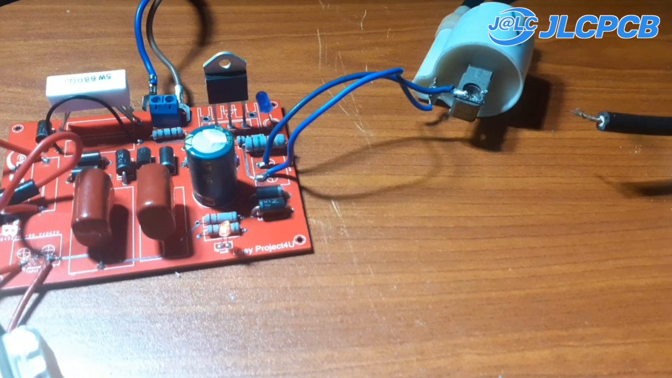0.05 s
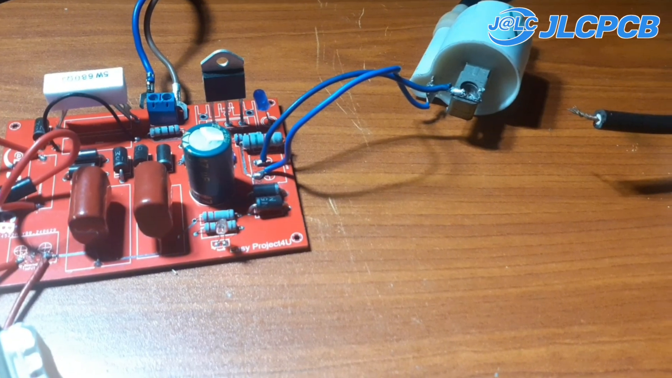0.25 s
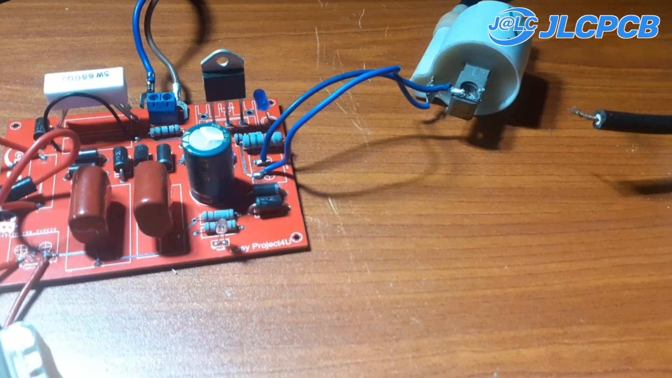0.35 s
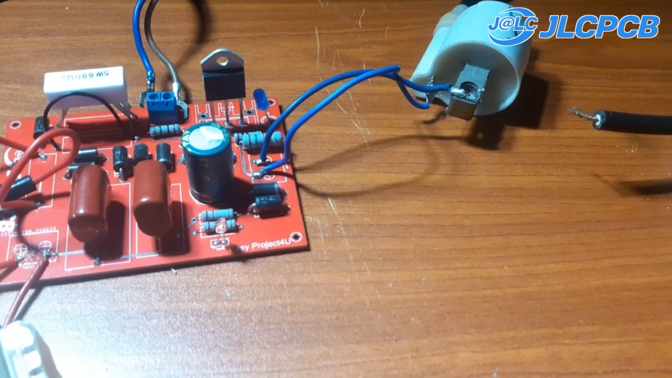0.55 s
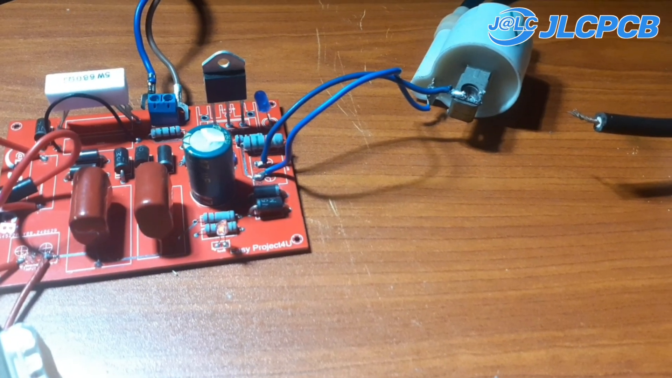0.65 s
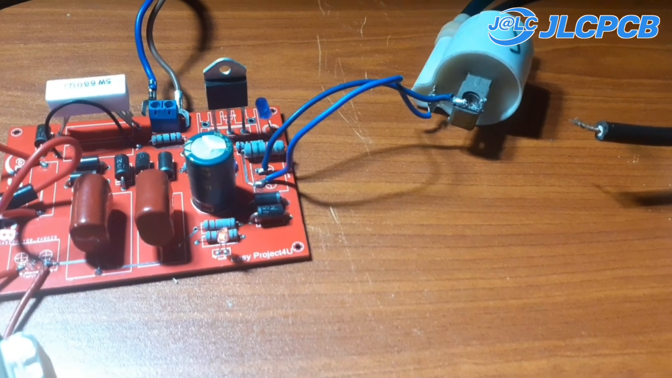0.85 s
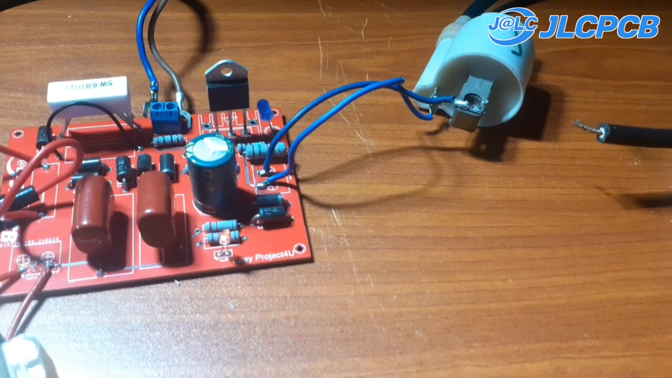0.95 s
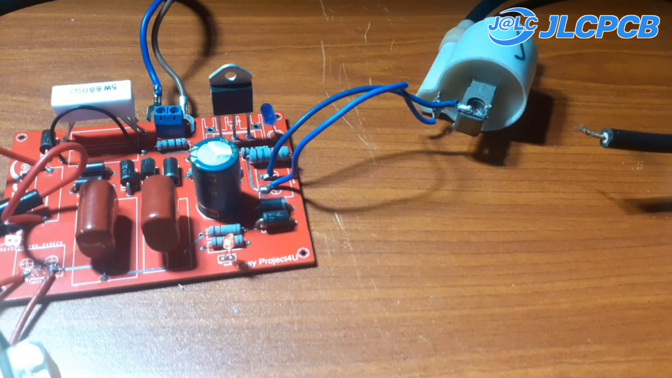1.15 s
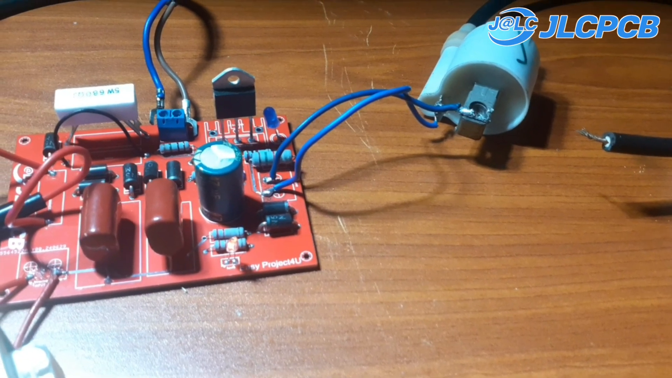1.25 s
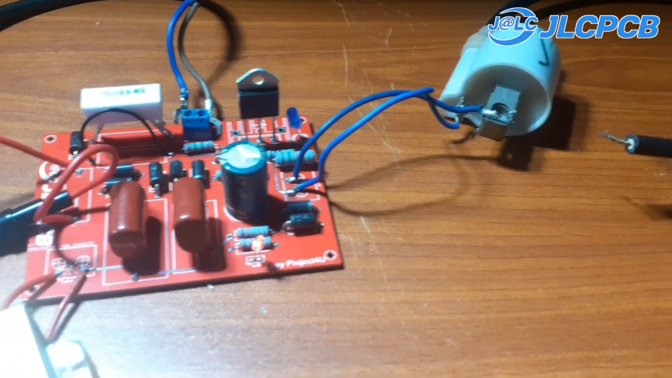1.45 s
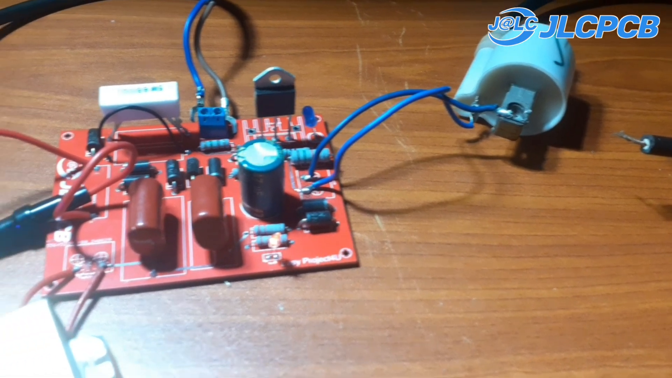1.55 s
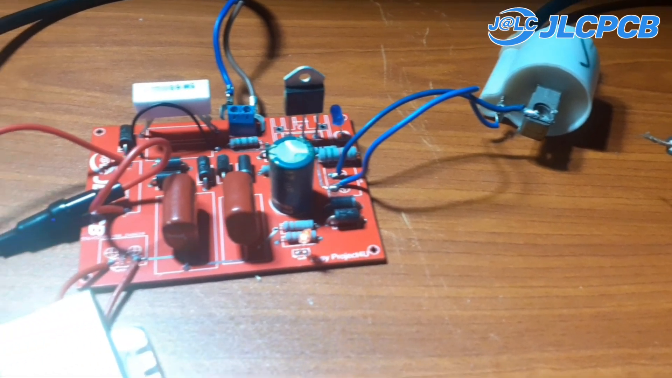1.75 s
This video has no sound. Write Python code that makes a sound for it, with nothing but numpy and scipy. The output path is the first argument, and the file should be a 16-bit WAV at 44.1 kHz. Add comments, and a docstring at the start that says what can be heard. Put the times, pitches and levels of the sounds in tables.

```python
"""In a small room, a high-voltage coil on a wooden desk snaps one spark across its gap.
The shock wave reflects off the desk and reverberates in the room, and the discharge kicks the
microphone's circuit into a short low thump. Throughout, drive pulses make the coil tick about
160 times a second, sagging after the spark and recovering, over a slowly beating hum."""
import sys
import numpy as np
from scipy import signal
from scipy.fft import rfft, irfft, next_fast_len
from scipy.io import wavfile

SR = 44100
rng = np.random.default_rng(int(sys.argv[2]) if len(sys.argv) > 2 else 0)


def generate_wav(signal):
    """Clip the signal to [-1, 1] and save it as 16-bit WAV at the path in sys.argv[1]."""
    frames = np.transpose(np.atleast_2d(signal))
    scaled = np.clip(frames, -1, 1) * 32767
    pcm = np.round(scaled).astype(np.int16)
    wavfile.write(sys.argv[1], SR, pcm)


N = 79380

# The discharge across the gap. Each row: start in seconds, strength in dB.
DISCHARGES = [(0.2407, 4.0)]


def amp(db):
    """Amplitude ratio of a level in decibels."""
    return 10 ** (np.asarray(db) / 20)


def unit(x):
    """Normalisation to an rms of 1."""
    return x / np.sqrt(np.mean(x ** 2) + 1e-20)


def along(points, hz):
    """Interpolation of (Hz, value) points on a logarithmic frequency axis."""
    f, v = np.transpose(points)
    return np.interp(np.log(hz + 1), np.log(f + 1), v)


def filtered(x, response):
    """Linear filtering: the spectrum of x times a complex frequency response."""
    size = 2 * next_fast_len(N)
    return irfft(rfft(x, size) * response(np.fft.rfftfreq(size, 1 / SR)), size)[..., :N]


def coloured(x, spectrum, pan=((1, 0), (2, 0))):
    """Minimum-phase stereo filtering at unit mean power gain; pan is left minus right in dB."""
    def response(hz):
        gain = unit(amp(along(spectrum, hz) + np.outer([.5, -.5], along(pan, hz))))
        cepstrum = irfft(np.log(gain + 1e-9))
        half = len(hz) - 1
        cepstrum[:, 1:half] *= 2  # folding makes the response causal
        cepstrum[:, half + 1:] = 0
        return np.exp(rfft(cepstrum))
    return filtered(x, response)


def delay(seconds, hz):
    """A pure delay: phase lag proportional to frequency."""
    return np.exp(-2j * np.pi * np.outer(seconds, hz))


def reverberate(x, t60s, build_s):
    """Diffuse field: convolution with unit-energy noise that decays exponentially in each band."""
    hz, t, bands = signal.stft(rng.standard_normal((2, SR)), SR, nperseg=256)
    decay = amp(-60 * t / along(t60s, hz)[:, None])
    tail = signal.istft(bands * decay, SR, nperseg=256)[1]
    tail *= 1 - np.exp(-np.arange(tail.shape[1]) / SR / build_s)
    tail /= np.linalg.norm(tail, axis=1, keepdims=True)
    return signal.fftconvolve(x, tail, axes=1)[:, :N]


def pulses(times, gains):
    """Band-limited impulses: windowed sincs centred between samples."""
    centres = np.asarray(times)[:, None] * SR
    taps = np.floor(centres).astype(int) + np.arange(-7, 9)
    kernel = np.sinc(taps - centres) * np.cos(np.pi * (taps - centres) / 16) ** 2
    return np.bincount(np.clip(taps, 0, N).ravel(), (kernel * gains[:, None]).ravel(), N + 1)[:N]


def background():
    """Beating: close hum tones interfere, and a rumble swells in step with them under faint hiss."""
    # Hum tones. Each row: frequency in Hz, rms level in dB.
    tones = [(49.0, -67), (50.85, -69.5), (100.1, -78), (101.9, -76), (203.7, -83)]
    # Noise spectra. Each row: frequency in Hz, relative level in dB.
    rumble_spectrum = [(25, -9), (40, -4), (70, 1.5), (130, -1), (220, 1), (400, -10.5), (490, -5.5),
                       (620, -21.5), (800, -25.5), (2000, -20.5)]
    hiss_spectrum = [(25, -13), (300, -7.5), (600, -10), (1000, -19), (1900, 2), (3300, -2.5), (5000, -27),
                     (6600, -3.5), (9000, -17), (12000, -17.5), (15500, -10), (16000, -17)]
    t = np.arange(N) / SR - 0.53  # seconds from a crest of the beat
    hum = sum(amp(db) * np.sqrt(2) * np.cos(2 * np.pi * hz * t) for hz, db in tones)
    beat = np.cos(2 * np.pi * (tones[1][0] - tones[0][0]) * t)
    mid, side = coloured(rng.standard_normal((2, N)), rumble_spectrum)
    rumble = unit(mid + 0.52 * np.outer([1, -1], side)) * amp(-71.5 + 3.2 * beat)
    hiss = unit(coloured(rng.standard_normal((2, N)), hiss_spectrum))
    return hum + rumble + amp(-72.5) * hiss


def coil_ticks():
    """Impulse excitation: each drive pulse sounds the core, a 3 kHz ring, a rattle and a thin whine."""
    # Drive rate. Each row: time in seconds, ticks per second.
    rate = [(0, 161.5), (0.238, 161.5), (0.25, 159.3), (0.55, 159.55), (0.95, 159.95), (1.5, 161.0),
            (1.8, 161.25)]
    # The coil's resonances. Each row: frequency in Hz, relative level in dB.
    core_spectrum = [(100, -30), (200, -9), (320, -7), (490, -9.5), (640, -27.5), (1100, -30), (1450, -8),
                     (1900, 1), (2200, -7.5), (2450, 0.5), (2800, -10), (3200, 7.5), (3600, 1.5),
                     (4300, -30), (5100, -14), (6500, -4.5), (7900, -17), (9000, -16.5), (16000, -28)]
    whine_spectrum = [(100, -70), (14000, -40), (15000, -13), (15400, 0), (15650, -5), (15900, -35)]
    ring_spectrum = [(100, -24.5), (1800, -34.5), (2600, -11), (3050, -12), (3400, 5.5), (3900, -0.5),
                     (4400, -8), (4800, -23), (5400, -16), (16000, -79.5)]
    rattle_spectrum = [(100, -103), (7000, -40), (9200, -31), (9950, -5), (10800, -4.5), (11500, -18),
                       (11950, 3), (12600, -27.5), (13200, -0.5), (13700, -8.5), (14100, -5),
                       (14700, -27.5), (16000, -27)]
    # The whine rises near the end. Each row: time in seconds, level in dB.
    whine_levels = [(0, -80), (1.3, -87), (1.6, -73), (1.8, -72)]
    # Sag and recovery. Each row: time in seconds, ring level in dB, rattle level in dB.
    brightness = [(0, -60.5, -71.5), (0.22, -60.5, -72.5), (0.259, -61.5, -78), (0.7, -68.5, -74.5),
                  (1.0, -65.5, -72.5), (1.245, -64.5, -72.5), (1.27, -60.5, -71.5), (1.55, -59.5, -70),
                  (1.8, -59.5, -70.5)]
    # The ticks' reverberation. Each row: frequency in Hz, 60 dB decay time in seconds.
    room_t60 = [(100, 0.063), (16000, 0.042)]
    first_tick_s, right_lag_s, spread_db = 0.0025, 0.0003892, 0.33
    t = np.arange(N) / SR
    cycles = np.cumsum(np.interp(t, *np.transpose(rate))) / SR
    cycles -= np.interp(first_tick_s, t, cycles)
    times = np.interp(np.arange(int(cycles[-1]) + 1), cycles, t)
    train = unit(pulses(times, amp(-spread_db * rng.standard_normal(len(times)))))

    def resonance(spectrum, db, left_db):
        return coloured(train * amp(db), spectrum, pan=[(1, left_db)])

    knots_s, ring_db, rattle_db = np.transpose(brightness)
    core = resonance(core_spectrum, db=-66, left_db=-0.5)
    whine = resonance(whine_spectrum, np.interp(t, *np.transpose(whine_levels)), left_db=-0.5)
    ring = resonance(ring_spectrum, np.interp(t, knots_s, ring_db), left_db=13)
    rattle = resonance(rattle_spectrum, np.interp(t, knots_s, rattle_db), left_db=14)
    direct = filtered(core + whine + ring + rattle, lambda hz: delay([0, right_lag_s], hz))
    room = reverberate(core + whine + 0.5 * (ring + rattle), room_t60, build_s=0.0016)
    return direct + amp(-10) * room


def discharge():
    """Impulsive source: the spark lasts only an instant."""
    starts, db = np.transpose(DISCHARGES)
    return pulses(starts, amp(db))


def circuit_thump():
    """Electrical pickup: the discharge kicks the microphone's circuit, which rings with falling pitch."""
    # Pickup gain in dB, left then right.
    pickup_db = [-17, -20.5]
    kick_s, ring_s = 0.0011, 0.021
    final_hz, drop_hz, drop_s = 52, 113, 0.0038
    t = np.arange(N) / SR
    kick = -amp(1) * np.sin(np.pi * np.minimum(t / kick_s, 1))
    after = np.maximum(t - kick_s, 0)
    cycles = final_hz * after + drop_hz * drop_s * (1 - np.exp(-after / drop_s))
    ring = np.sin(2 * np.pi * cycles) * np.exp(-(after / ring_s) ** 2)
    thump = signal.fftconvolve(discharge(), kick + ring)[:N]
    return np.outer(amp(pickup_db) * [1, -1], thump)  # opposite polarity on the two channels


def spark():
    """Multipath propagation: a shock wave arrives directly, by reflection and as reverberation."""
    # Spectra of the shock wave and the room's answer. Each row: frequency in Hz, relative level in dB.
    crack_spectrum = [(120, -18.5), (400, -16), (900, -15), (1680, -7), (2300, -4.5), (3100, -5),
                      (4350, -7), (5730, -8.5), (7010, -11), (8270, -11), (9400, -17), (10900, -7),
                      (12200, -14), (14900, -9), (16000, -11.5)]
    room_spectrum = [(88, -63), (150, -17), (368, -15.5), (484, -14.5), (716, -13), (1040, -11.5),
                     (1120, -9.5), (1560, -11), (1720, -8), (2550, -6), (4950, -8.5), (8070, -7),
                     (9820, -14), (15100, -9), (16000, -26.5)]
    # Their stereo balance. Each row: frequency in Hz, left minus right in dB.
    crack_pan = [(300, 2), (700, 22.5), (1290, 1), (2380, -5.5), (4400, 5.5), (8120, -6), (15000, -3.5)]
    room_pan = [(500, -1.5), (2400, 0), (4400, -0.5), (8100, -3.5), (15000, 1.5)]
    # Reflections off the desk and coil. Each row: left and right delays in seconds, gain.
    bounces = [(0.00009, 0.00012, 0.7), (0.00035, 0.00035, 0.71), (0.00047, 0.000534, -0.4)]
    # Reflections off nearby surfaces. Each row: delay in seconds, gain in dB.
    echoes = [(0.0056, -16.5), (0.0162, -28.5), (0.0255, -27.5)]
    # The room's main and lingering decays. Each row: frequency in Hz, 60 dB decay time in seconds.
    room_t60 = [(200, 0.31), (1000, 0.34), (3000, 0.37), (8000, 0.31), (15000, 0.24)]
    linger_t60 = [(200, 0.39), (1000, 0.87), (3000, 1), (7000, 0.81), (11000, 0.84), (15000, 0.26)]
    shock = discharge()
    crack = coloured(shock, crack_spectrum, crack_pan)
    bounced = filtered(crack, lambda hz: sum(gain * delay(lags, hz) for *lags, gain in bounces))
    scatter = amp(-2) * reverberate(crack, t60s=[(1, 0.03)], build_s=0.0006)
    wash = coloured(shock, room_spectrum, room_pan)
    echoed = filtered(wash, lambda hz: sum(amp(db) * delay(lag, hz) for lag, db in echoes))
    early = reverberate(echoed, t60s=[(1, 0.0073)], build_s=0.0001)
    room = amp(3) * reverberate(wash, room_t60, build_s=0.006)
    linger = amp(-21.5) * reverberate(wash, linger_t60, build_s=0.006)
    return scatter + early + room + linger - amp(2.5) * (crack + bounced)


def scene():
    """Superposition of all sources at the microphone."""
    return spark() + circuit_thump() + coil_ticks() + background()


def record(dry):
    """Saturation and band limiting: clipping at full scale, then a steep low-pass."""
    cutoff_hz = 16000
    return filtered(np.clip(dry, -1, 1), lambda hz: 1 / np.sqrt(1 + (hz / cutoff_hz) ** 160))


dry = scene()
out = record(dry)
generate_wav(out)
```